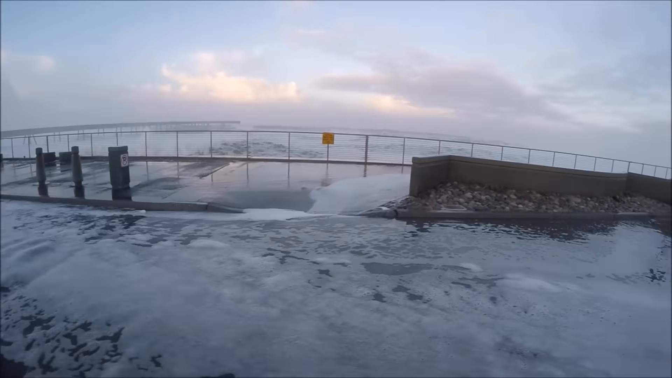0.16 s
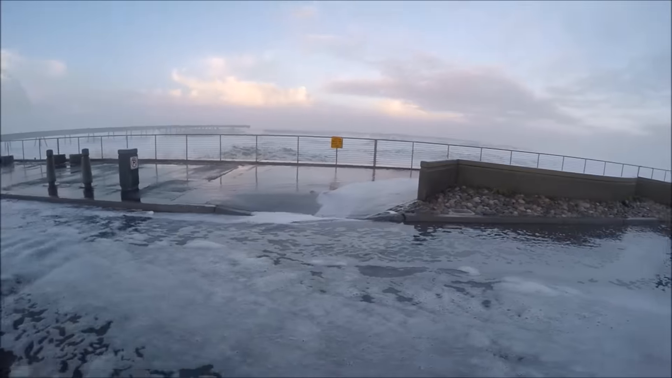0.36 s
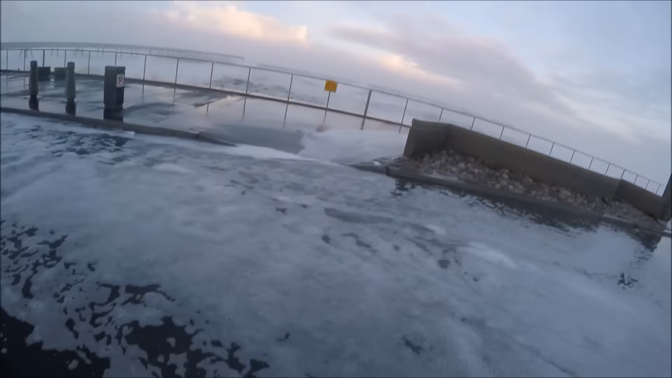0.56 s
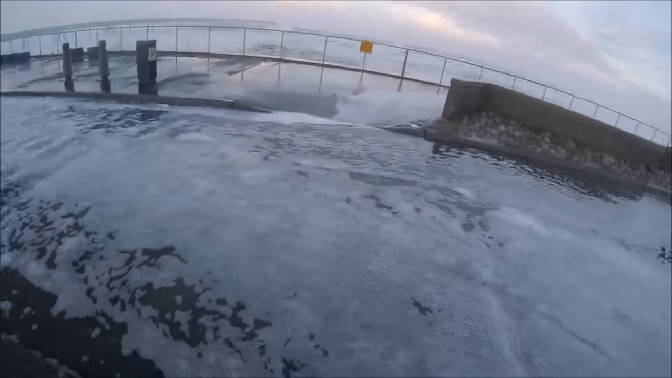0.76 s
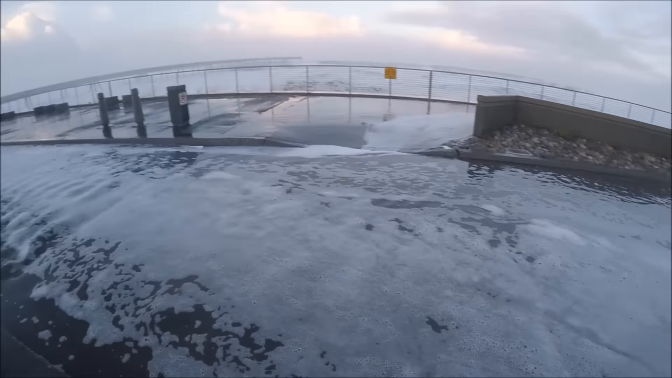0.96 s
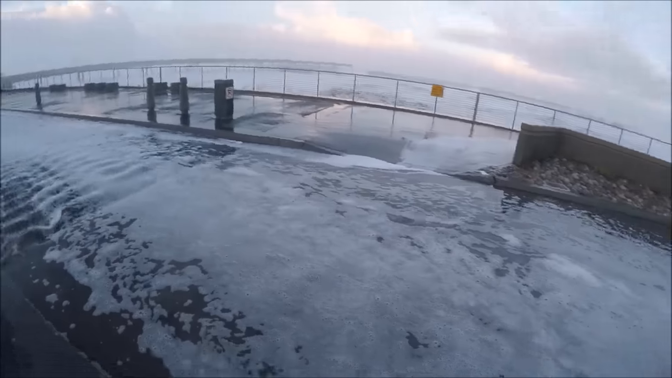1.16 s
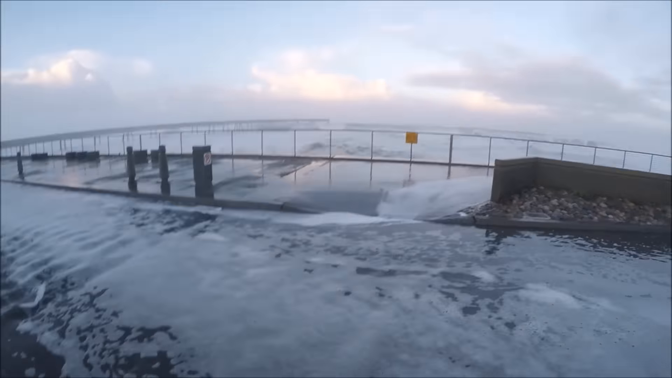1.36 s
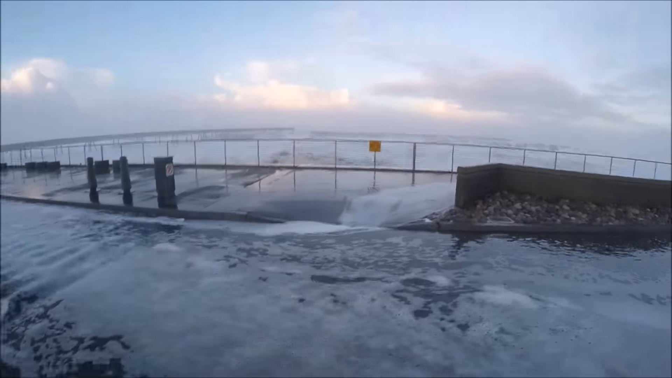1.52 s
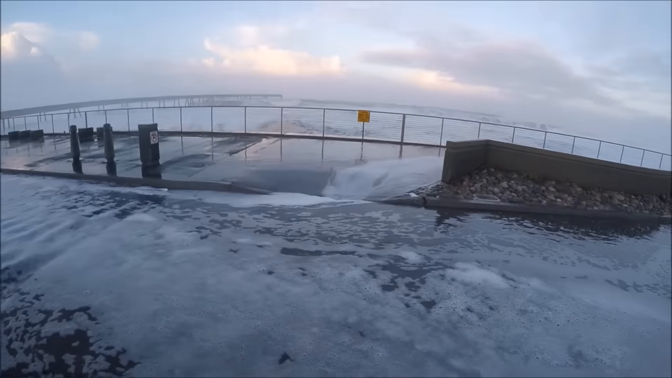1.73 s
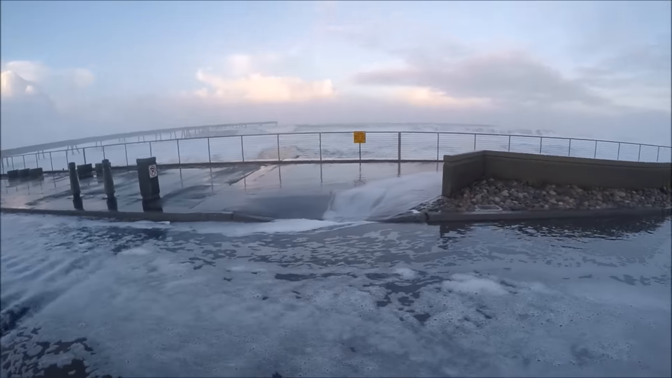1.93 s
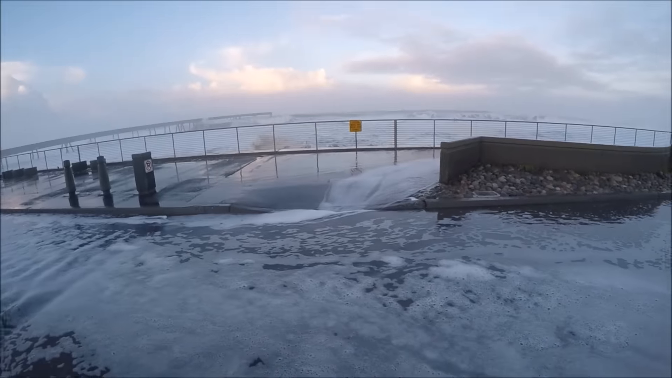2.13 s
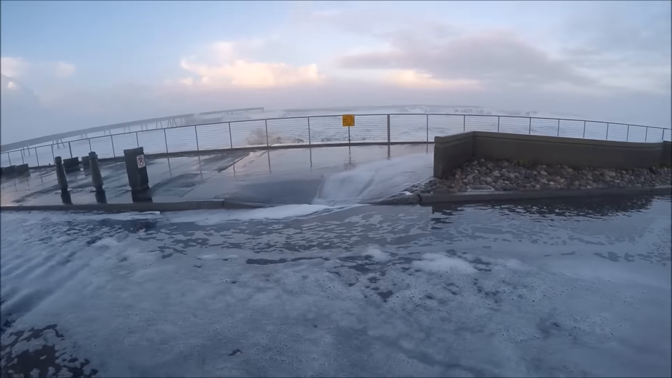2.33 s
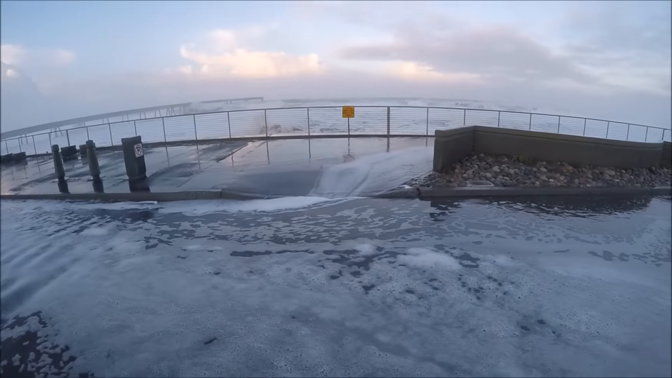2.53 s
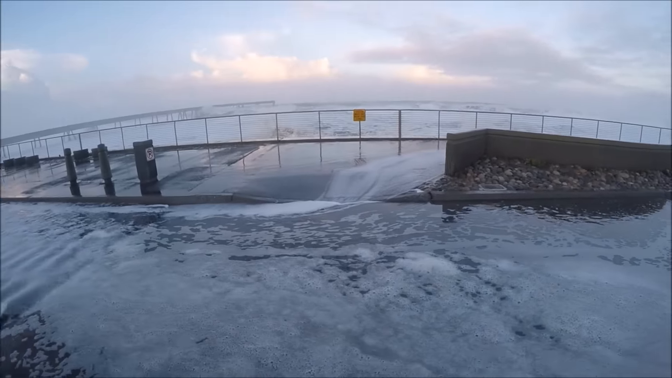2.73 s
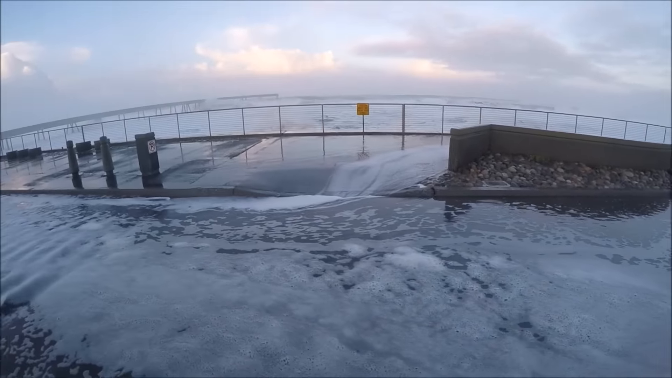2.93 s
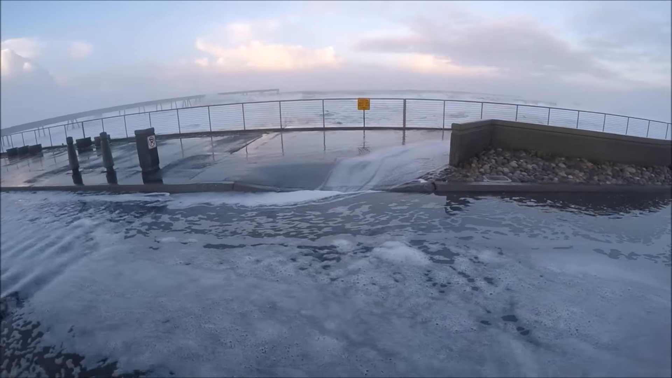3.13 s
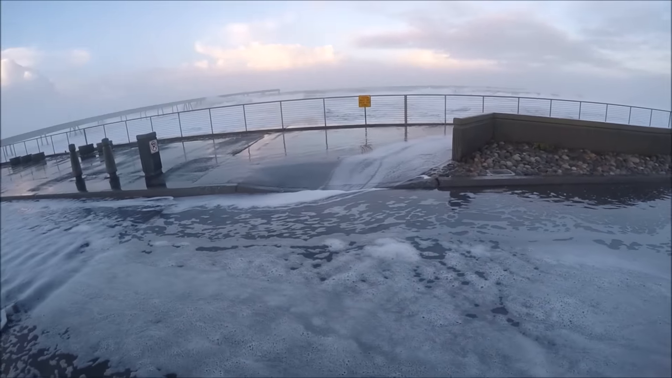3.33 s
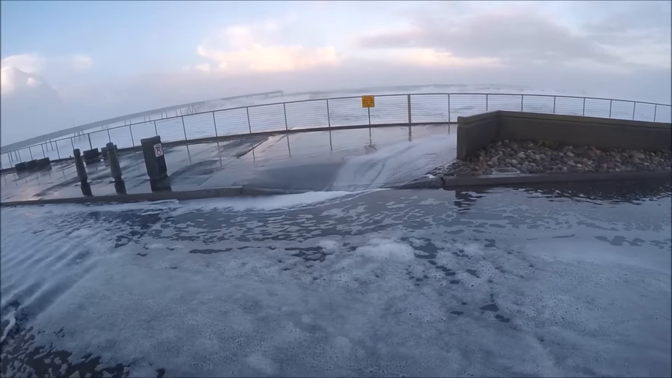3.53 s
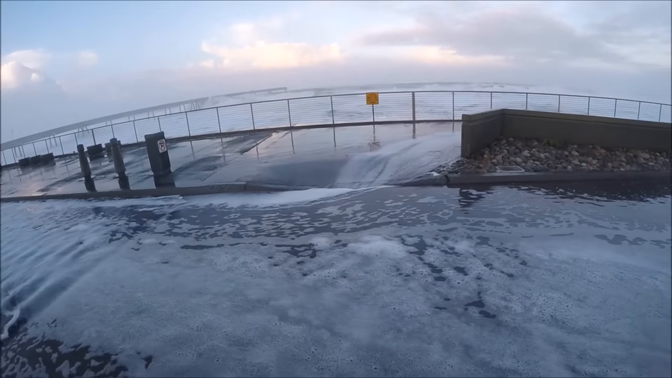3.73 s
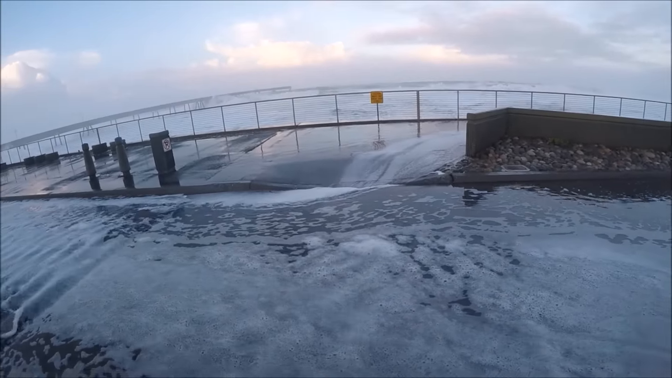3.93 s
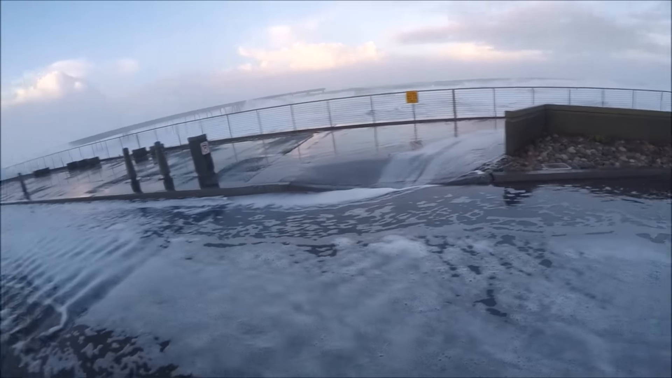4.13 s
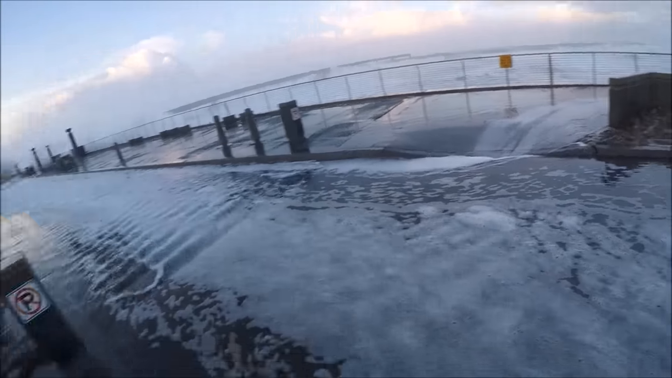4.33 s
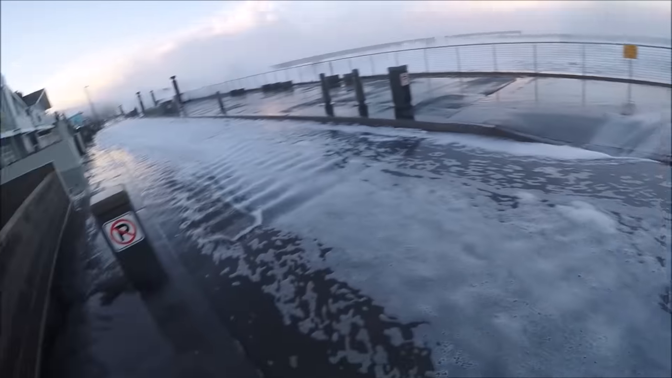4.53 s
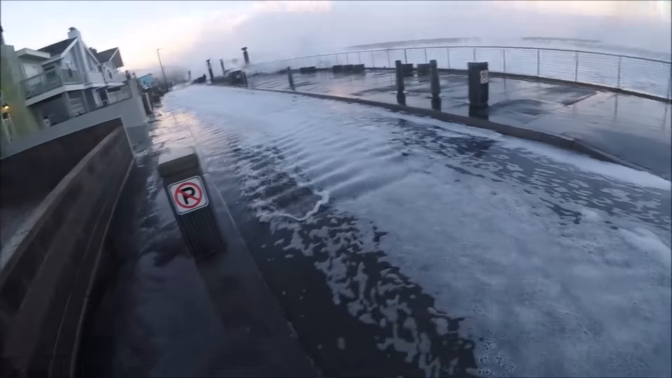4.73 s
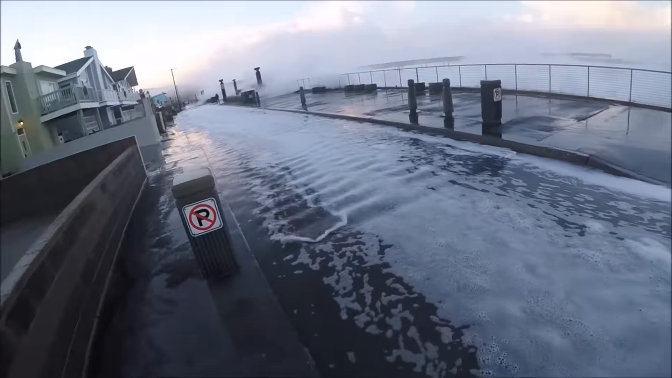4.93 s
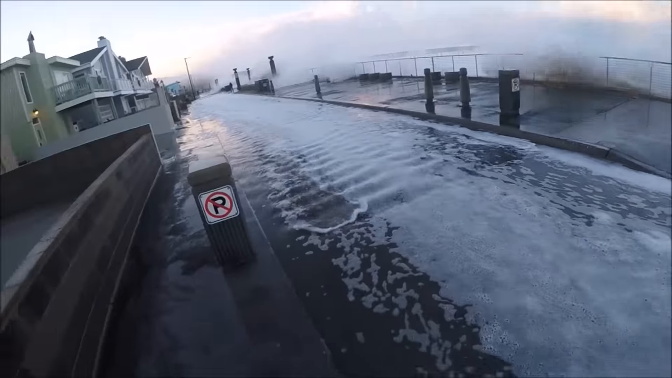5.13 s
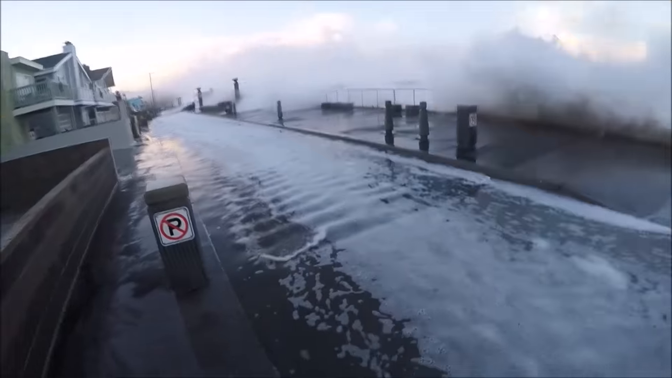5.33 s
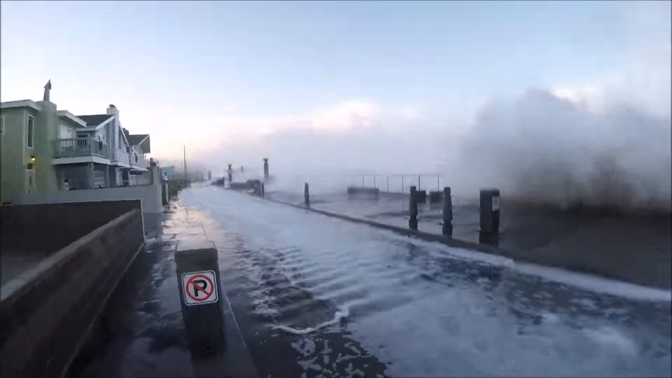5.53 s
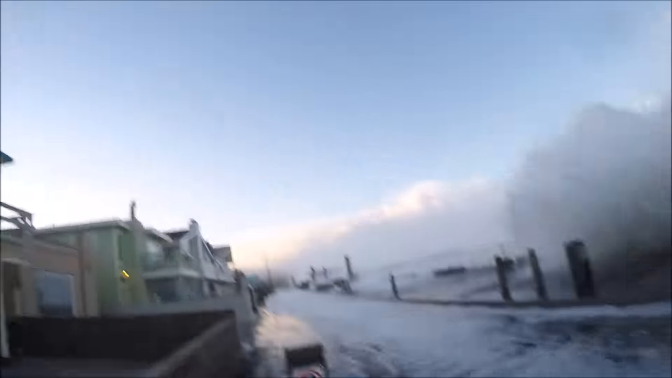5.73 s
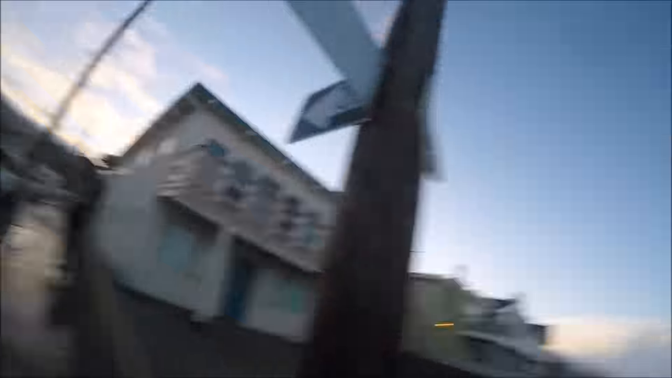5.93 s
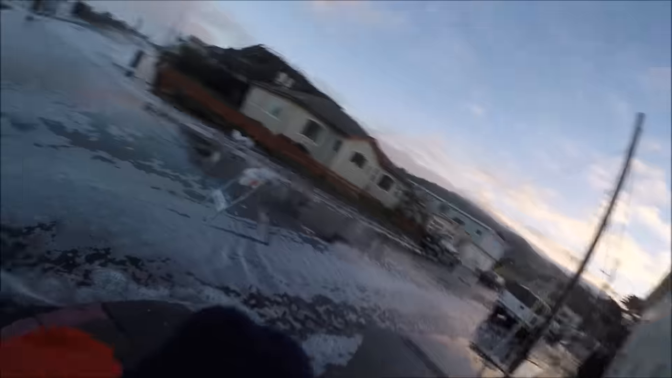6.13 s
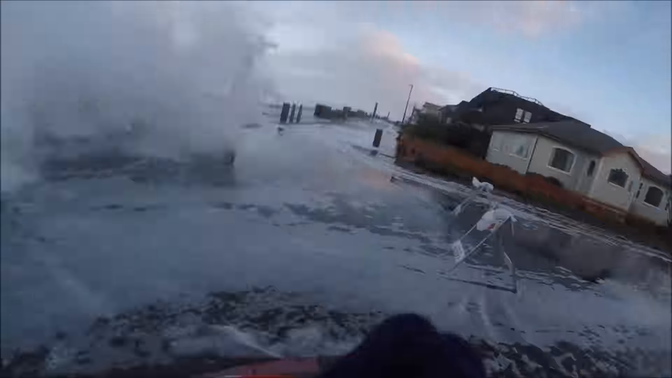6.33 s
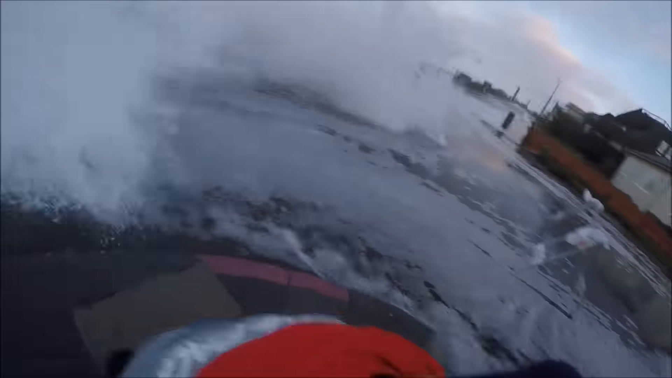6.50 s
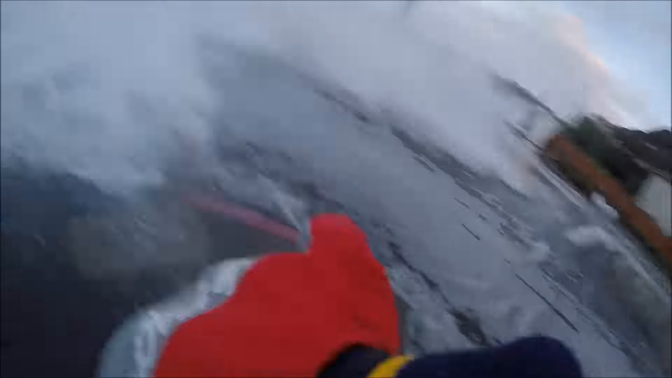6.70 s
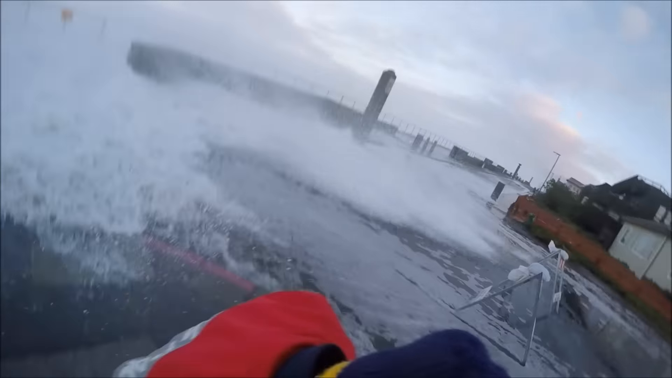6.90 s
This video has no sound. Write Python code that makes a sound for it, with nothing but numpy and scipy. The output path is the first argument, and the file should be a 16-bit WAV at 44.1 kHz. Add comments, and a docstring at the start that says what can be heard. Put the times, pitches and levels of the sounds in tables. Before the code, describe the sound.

A hand rubs, squeaks and knocks on a small camera's waterproof plastic case, close and loud, with low thumps and wind rumble. The handling stops, leaving the faint, muffled fizz of surf washing over a walkway and a few tiny drips. The water swells, a wave bursts on a sea wall and its spray rains down, while the handling returns and the buffeting grows.

```python
"""Storm surf washes over a walkway, then a wave bursts on the sea wall and its spray rains down.
The water is thousands of tiny splashes, heard through a small camera's waterproof plastic case.
Early on, a hand rubs, squeaks, bumps and knocks on the case; later a few single drops tick on it.
As the wave bursts, the handling returns and a low rumble of buffeting air grows."""
import sys
import numpy as np
from scipy import signal
from scipy.fft import rfft, irfft
from scipy.io import wavfile
from scipy.ndimage import uniform_filter1d

SR = 44100
rng = np.random.default_rng(int(sys.argv[2]) if len(sys.argv) > 2 else 0)


def store_pcm(level_fs):
    """Save levels as 16-bit WAV."""
    pcm = np.round(np.clip(level_fs, -1, 1) * 32767).astype(np.int16)
    wavfile.write(sys.argv[1], SR, np.atleast_2d(pcm).T)


N = 306932


def from_db(db):
    """Turn decibels into a number to multiply by."""
    return 10 ** (np.asarray(db) / 20)


def rms_one(x):
    """Scale a signal so that its average strength (rms) is 1."""
    return x / np.sqrt(np.mean(x ** 2) + 1e-20)


def cut(x, hz, kind, order=2):
    """Keep the "low" part, the "high" part or one "band" of a sound."""
    return signal.sosfilt(signal.butter(order, hz, kind, fs=SR, output="sos"), x)


def drift(rate):
    """A smooth random wander of size about 1 that turns about `rate` times a second."""
    pole = np.exp(-40 * np.pi * rate / SR)
    noise = rng.standard_normal(N // 20 + 2002)   # one value per 20 samples, plus a run-in
    slow = signal.lfilter([1], [1, -2 * pole, pole * pole], noise)[2000:]
    return np.interp(np.arange(N) / 20, np.arange(len(slow)), rms_one(slow))


def coloured(x, spectrum, modes=(), size=4096):
    """Shape a sound with a broad tone curve (f/Hz, level/dB) plus narrow peaks and dips."""
    hz = np.maximum(np.arange(size // 2 + 1) * SR / size, 1)
    points = np.array(spectrum)
    db = np.interp(np.log(hz), np.log(points[:, 0]), points[:, 1])
    db += sum(height / (1 + (2 * (hz - centre) / width) ** 2) for centre, width, height in modes)
    cepstrum = irfft(np.log(from_db(db)))   # used to make the filter ring only after a hit
    response = irfft(np.exp(rfft(2 * cepstrum[:size // 2], size) - cepstrum[0]))
    return signal.fftconvolve(x, response / np.linalg.norm(response))[:N]


def grains(per_s, spread_db):
    """Tiny random hits of uneven size."""
    sizes = from_db(spread_db * np.clip(rng.standard_normal(N), -2, 2)) * rng.choice([-1, 1], N)
    return rms_one(sizes * (rng.random(N) < per_s / SR))


def add(track, start, sound):
    """Lay a sound into a track, `start` seconds in."""
    at = int(start * SR)
    track[at:at + len(sound)] += sound[:N - at]


def churned(x, depth_db, rate):
    """Each octave swells and sinks by itself as the water tumbles."""
    out = 0
    for edge_hz in 150 * 2 ** np.arange(7):
        low = signal.sosfiltfilt(signal.butter(2, edge_hz, fs=SR, output="sos"), x)
        out += low * from_db(depth_db * drift(rate))
        x = x - low
    return rms_one(out + x)


def swell(start, rise_s, hold_s, fall_db_per_s):
    """The loudness of one rush of water: it rises, holds and dies away."""
    t = np.arange(N) / SR - start
    return np.clip(t / rise_s, 0, 1) * from_db(-fall_db_per_s * np.maximum(t - rise_s - hold_s, 0))


# Tone curves of the flowing water, the bursting wave and the spray: f/Hz, level/dB
WASH_TONE = [(100, 13.5), (200, 5), (300, 0.5), (500, -4), (900, -8.5), (1450, -9.5), (1750, -4.5),
             (2300, -4.5), (3250, -2), (3750, -11.5), (5500, -11.5), (7500, -21), (13000, -26.5),
             (15500, -27)]
BURST_TONE = [(100, -18.5), (300, -5.5), (600, -12.5), (1300, -18.5), (1800, -7), (3100, 0.5), (3800, -8),
              (4500, -7), (5000, -12.5), (7200, -14.5), (8300, -22.5), (10200, -22), (11500, -39),
              (15500, -28)]
SPRAY_TONE = [(100, -19), (350, -16.5), (600, -14.5), (1050, -6.5), (1400, -10), (1800, -5.5), (3250, 0.5),
              (3800, -6.5), (4500, -5), (5000, -7.5), (6700, -12.5), (7800, -18), (10300, -18),
              (15500, -27.5)]
# Peaks and dips that outside sound gets from the case's walls: f/Hz, width/Hz, level/dB
CASE_WALL_PEAKS = [(1727, 190, 5), (3280, 130, 2), (4394, 300, 2), (4930, 325, -4), (5350, 340, 2),
                   (6020, 280, -4.5), (6660, 306, 3.5), (10150, 760, 2)]
# The wave runs up, bursts and rains down: t/s, rise/s, hold/s, burst level/dB, spray level/dB
WAVE_RUSHES = [(4.565, 0.14, 0.81, -49, -57), (5.01, 0.11, 0.08, -41, -47),
               (5.255, 0.033, 0.11, -38.5, -47), (5.398, 0.39, 0.2, -47, -51),
               (5.88, 0.31, 0.08, -38, -33.5), (6.185, 0.32, 0.3, -39.5, -30.5)]

def surf():
    """Water fizzes over the walkway; the bursting wave and its spray are swarms of drops."""
    surge = np.clip((np.arange(N) / SR - 3.65) / 2.03, 0, 1)   # the flow swells as the wave comes in
    wash_gain = from_db(-52 + 7.5 * surge)
    burst_power = spray_power = 0
    for start, rise_s, hold_s, burst_db, spray_db in WAVE_RUSHES:
        burst_power += (from_db(burst_db) * swell(start, rise_s, hold_s, fall_db_per_s=33)) ** 2
        spray_power += (from_db(spray_db) * swell(start, rise_s, hold_s, fall_db_per_s=37)) ** 2
    wash = coloured(grains(per_s=6000, spread_db=0.5), WASH_TONE, CASE_WALL_PEAKS)
    wash = wash_gain * churned(wash, depth_db=0.5, rate=20)
    burst = coloured(grains(per_s=7000, spread_db=2), BURST_TONE, CASE_WALL_PEAKS)
    burst = np.sqrt(burst_power) * churned(burst, depth_db=1.9, rate=25)
    spray = coloured(grains(per_s=12000, spread_db=5), SPRAY_TONE, CASE_WALL_PEAKS)
    spray = np.sqrt(spray_power) * churned(spray, depth_db=0.4, rate=23)
    return cut(wash + burst + spray, 90, "high")


# The rumble, stronger the more the case is moved: t/s, level/dB
BUFFET_LEVELS = [(0, -34.5), (.27, -36), (.55, -20.5), (.85, -30), (1.2, -27), (2.2, -42), (3.2, -41),
                 (4.2, -36), (5.2, -34), (5.9, -19), (6.25, -18), (6.96, -17.5)]

def buffeting(even_out_s=0.13):
    """Air and arm movement sway the case: a lumpy rumble, mostly below 80 Hz."""
    tone = [(10, -16), (20, 3), (35, 0), (66, -7), (94, -20), (130, -19.5), (220, -36),
            (320, -61.5), (700, -87), (2000, -120)]   # f/Hz, level/dB
    sway = coloured(rng.standard_normal(N), tone, size=16384)
    sway /= np.sqrt(uniform_filter1d(sway ** 2, int(even_out_s * SR)) + 1e-6)
    times, levels = np.transpose(BUFFET_LEVELS)
    level_db = np.interp(np.arange(N) / SR, times, levels)
    wide = np.clip((level_db + 31.5) / 16, 0, 1)   # wide swings are slower, so deeper
    deep = rms_one(signal.sosfiltfilt(signal.butter(1, 70, fs=SR, output="sos"), sway))
    return from_db(level_db) * (wide * deep + (1 - wide) * sway)


# Strokes of the hand: t/s, length/s, drag level/dB, bite/dB (how far the squeak tops the drag)
HAND_STROKES = [(0.259, 0.085, -30, 11.5), (0.326, 0.045, -29.5, 5), (0.369, 0.016, -27, 13.5),
                (0.38, 0.032, -41, -7), (0.435, 0.056, -35.5, -1.5), (0.478, 0.088, -35, 12),
                (0.556, 0.065, -33, 12), (0.606, 0.075, -36, 4), (0.673, 0.072, -29, 5.5),
                (0.731, 0.18, -35.5, 6), (0.899, 0.1, -30.5, 7), (0.98, 0.1, -33.5, -0.5),
                (1.048, 0.14, -29.5, 6), (1.169, 0.076, -28, 5), (1.295, 0.085, -52, 1.5),
                (1.371, 0.08, -39, -2), (1.438, 0.093, -29, -0.7), (1.565, 0.057, -33, 0),
                (1.611, 0.11, -35.5, -0.7), (1.708, 0.18, -45.5, -4.5), (5.272, 0.21, -49.5, 0),
                (5.495, 0.072, -40, -4), (5.584, 0.062, -32.5, 0), (5.665, 0.043, -39, 1.5),
                (5.742, 0.072, -41, -1), (5.81, 0.092, -42, -0.5), (6.008, 0.098, -38.5, 1.5),
                (6.104, 0.18, -23.5, 1), (6.243, 0.071, -29.5, 9.5), (6.321, 0.047, -33.5, 0),
                (6.365, 0.11, -30.5, 5.5), (6.908, 0.06, -35, 3)]

def stroke_gains(linger_db=-22, linger_s=0.012):
    """How strong drag, squeak and grit are as each stroke speeds up, slows and briefly lingers."""
    power = np.zeros((3, N))
    for start, length_s, drag_db, bite_db in HAND_STROKES:
        arch = 0.76 / 2 ** (max(bite_db, 0) / 6)   # more bite, more sudden start and stop
        speed = np.abs(np.sin(np.linspace(0, np.pi, int(length_s * SR)))) ** arch
        squeak = from_db(bite_db) * speed
        grit = from_db(min(bite_db - 7, 2.5)) * speed ** 1.73   # grit needs both bite and speed
        for track, gain in zip(power, (speed, squeak, grit)):
            add(track, start, (from_db(drag_db) * gain) ** 2)
    fade = np.exp(-1 / (linger_s * SR))
    lingering = signal.lfilter([1 - fade], [1, -fade], power + 1e-18)
    return np.sqrt(power + from_db(linger_db) * lingering)


# Tone curve of the case when touched: f/Hz, level/dB
CASE_TONE = [(100, 4.5), (200, -24), (330, -21), (580, -4), (850, -1.5), (1200, 0), (1550, -4.5), (2400, 0),
             (3300, -13), (5500, -17), (7000, -16.5), (8200, -35.5), (11500, -36.5), (13200, -39.5),
             (15500, -54)]
# Pitches at which the case rings, and the dips between them: f/Hz, width/Hz, level/dB
CASE_RINGS = [(623, 170, 5), (833, 120, -5.5), (1820, 200, -1), (2126, 72, 7), (2490, 81, 5.5),
              (3520, 134, 9), (4010, 170, -12), (4330, 830, 14.5), (4940, 190, -19), (5410, 820, 7.5),
              (6320, 450, -13), (7950, 220, -13), (8450, 140, 9.5), (9270, 500, -0.5), (10100, 560, 7.5),
              (11370, 330, 6.5)]

def rubbing():
    """Many tiny slips ring the case: a dull drag, a squeak, and grit and rasp from a firm grip."""
    drag, squeak, grit = stroke_gains()
    firmness = np.clip(grit / drag, 0, 1)
    slips = grains(per_s=4500, spread_db=-1) * from_db(0.83 * drift(38))
    slips += from_db(-12) * grains(per_s=64, spread_db=-2)   # skin or cloth catches with a tick
    shell = coloured(slips, CASE_TONE, CASE_RINGS)
    low = rms_one(cut(cut(shell, 1650, "low", order=5), 116, "high")) * from_db(drift(23.9) - 0.56)
    middle = rms_one(cut(shell, [1650, 2900], "band", order=4)) * from_db(1.5 * drift(30) - 3)
    high = rms_one(cut(shell, 2720, "high", order=4)) * from_db(drift(7.9) - 1)
    air = cut(rng.standard_normal(N), [AIR_BOOM_HZ - 30, AIR_BOOM_HZ + 30], "band")
    boom = from_db(-9) * rms_one(air)
    rasp_tone = [(5000, -36.5), (8000, -2), (10000, 4), (11600, 0), (13000, -3.5), (15500, -15.5)]
    rasp = rms_one(coloured(slips, rasp_tone, CASE_RINGS)) * from_db(3 * drift(35) - 27)
    return drag * (low + boom) + squeak * (middle + firmness ** 2 * rasp) + grit * high


# Slips of the grip: t/s, length/s, first f/Hz, last f/Hz, level/dB
GRIP_SQUEAKS = [(.259, 0.0065, 2400, 2530, -14.5), (0.279, 0.035, 1714, 1876, -20),
                (0.301, 0.022, 1973, 2110, -17), (.37, 0.014, 2577, 2470, -16.5),
                (.482, 0.024, 2535, 2510, -24), (.684, .034, 1043, 1330, -24.5),
                (1.044, 0.038, 1264, 1415, -24), (1.9, .14, 1820, 1900, -55),
                (6.187, 0.025, 2205, 2265, -17), (6.272, 0.032, 2487, 2590, -17),
                (6.39, 0.04, 2480, 2510, -23)]

def squeaks(roughness=0.16, overtone_db=-17):
    """The hand sticks and slips so quickly that it makes a short, rough, gliding tone."""
    out = np.zeros(N)
    for start, length_s, from_hz, to_hz, db in GRIP_SQUEAKS:
        n = int(length_s * SR)
        noises = rng.standard_normal((2, SR // 5))
        wobble, shake = [rms_one(cut(noise, 257, "low")[-n:]) for noise in noises]
        hz = np.linspace(from_hz, to_hz, n) * (1 + 0.025 * wobble)
        phase = 2 * np.pi * np.cumsum(hz) / SR
        tone = np.sin(phase) + from_db(overtone_db) * np.sin(2 * phase)
        arch = np.sin(np.linspace(0, np.pi, n))
        add(out, start, from_db(db) * tone * (1 + roughness * shake) * arch)
    return out


AIR_BOOM_HZ, AIR_BOOM_FADE_S = 143.5, 0.089   # the air sealed inside: pitch, time to fade by 60 dB
# Soft shoves on the case: t/s, level/dB, rocking f/Hz, boom level/dB (relative to the rocking)
SHOVES = [(.263, 4, 72.3, -2.5), (0.385, -9, 62.6, -7), (0.443, 3, 61.6, -9), (0.564, -9, 82, 2),
          (0.58, 0.5, 64.5, -34), (.609, -4, 64.6, -33), (0.673, -5, 49.5, -33), (1.104, -4.5, 64.3, -9),
          (1.156, 0, 64.6, -3), (1.61, -12.5, 27.6, -16), (1.837, -21, 89, -3), (5.546, -7.5, 52, -16.5),
          (5.622, -23, 87, 11.5), (5.972, -1.5, 37.3, -17), (6.177, -1, 33.6, -8), (6.499, -19.5, 80.6, 4),
          (6.646, -4.5, 30, -23), (6.754, -14, 82, -3)]

def thumps(rise_s=0.0032, rock_swings=7):
    """A shove sets the case rocking and the air sealed in it booming."""
    out, t = np.zeros(N), np.arange(SR // 2) / SR
    for start, db, hz, boom_db in SHOVES:
        rocking = np.sin(2 * np.pi * hz * t) * from_db(-60 * t * hz / rock_swings)
        boom = np.sin(2 * np.pi * AIR_BOOM_HZ * t) * from_db(boom_db - 60 * t / AIR_BOOM_FADE_S)
        add(out, start, from_db(db) * (rocking + boom) * (1 - np.exp(-t / rise_s)))
    return cut(out, 198, "low", order=4)


# Sharp knocks on the case: t/s, relative level/dB, dull above f/Hz, crunch fade/s
CASE_KNOCKS = [(0.292, -21, 900, 0.02), (0.4423, -28, 2300, 0.0089), (.498, -9.5, 1580, 0.015),
               (0.5626, -2, 6340, 0.0073), (.589, -11, 3500, 0.018), (0.747, -18, 2000, 0.006),
               (1.0974, -5, 1700, 0.004), (1.116, -22, 9000, .008), (1.428, -14.5, 1670, 0.0063),
               (1.817, -33.5, 3030, 0.019), (1.835, -24.5, 680, 0.0091), (4.327, -35, 1500, 0.011),
               (4.785, -42, 900, 0.011), (5.985, -21, 2200, 0.034), (6.221, -12, 1400, 0.019),
               (6.499, -21.5, 800, 0.023), (6.755, -25, 1500, 0.01)]

def knocks(crunch_db=-15, crack_db=-24, boost_db=14):
    """A hard tap and a short crunch after it ring the case; a thin crack comes straight through."""
    force, t = np.zeros(N), np.arange(SR // 10) / SR
    for start, db, dull_hz, fade_s in CASE_KNOCKS:
        contact = from_db(crunch_db) * rng.standard_normal(len(t)) * np.exp(-np.e * t / fade_s)
        contact[0] = 1   # the tap itself
        contact = cut(contact, dull_hz, "low", order=1)
        add(force, start, from_db(db + boost_db) * contact / np.linalg.norm(contact))
    crack = from_db(crack_db) * cut(force, [7000, 12500], "band")
    return coloured(force, CASE_TONE, CASE_RINGS) + crack


# Single drops of water: t/s, level/dB
WATER_DROPS = [(2.555, -46.5), (2.661, -60), (3.312, -53)]

def drops(splash_s=0.0067):
    """A drop lands on the case with a tiny bright splash."""
    out, t = np.zeros(N), np.arange(SR // 20) / SR
    for start, db in WATER_DROPS:
        add(out, start, from_db(db) * rng.standard_normal(len(t)) * np.exp(-t / splash_s))
    splash_tone = [(500, -25), (1500, -10), (2800, 7), (6000, -7), (8000, -14), (15000, -25)]
    return coloured(out, splash_tone, CASE_WALL_PEAKS)


def scene():
    """Water outside and handling on the case itself, mixed into one channel."""
    return (surf() + drops() + rubbing() + squeaks() + knocks() + thumps() + buffeting())[None]


def record(dry):
    """Block the slowest sway, round off the tallest peaks and cut the highest treble."""
    dry = cut(dry, 6, "high", order=1)
    rounded = dry / (1 + dry ** 6) ** (1 / 6)
    return signal.sosfilt(signal.ellip(10, 0.1, 80, 15400, fs=SR, output="sos"), rounded)


dry = scene()
out = record(dry)
store_pcm(out)
```